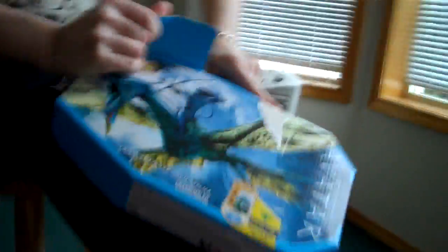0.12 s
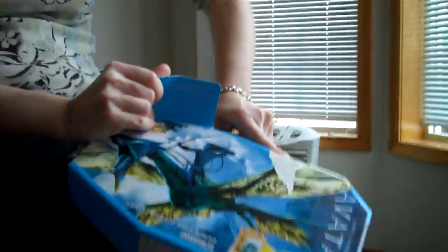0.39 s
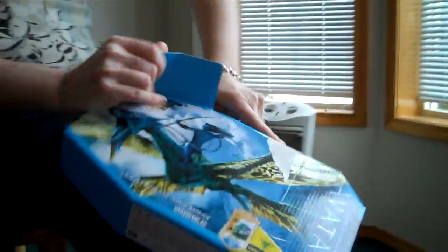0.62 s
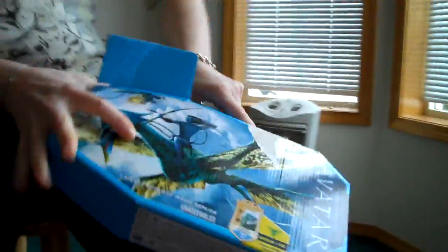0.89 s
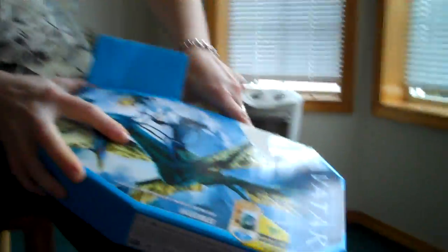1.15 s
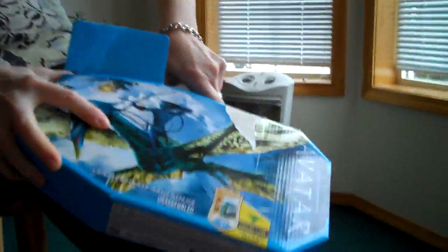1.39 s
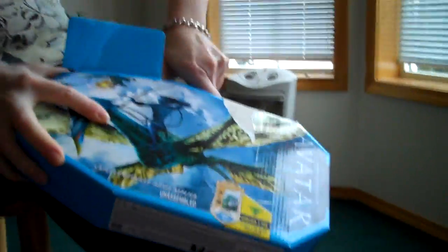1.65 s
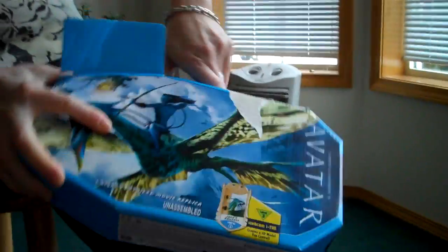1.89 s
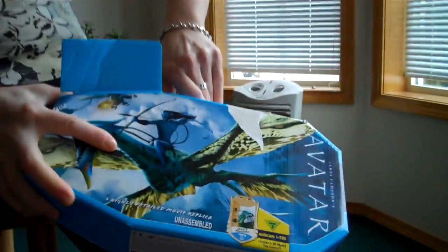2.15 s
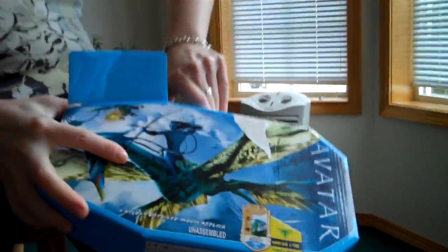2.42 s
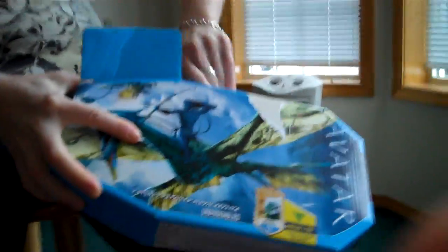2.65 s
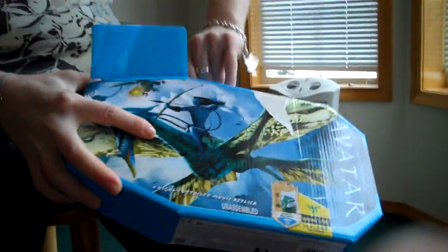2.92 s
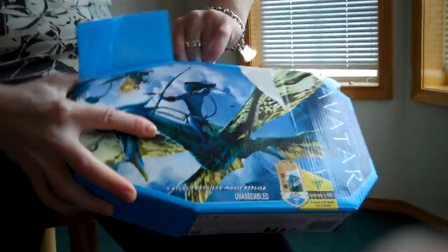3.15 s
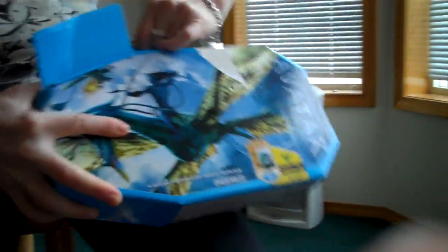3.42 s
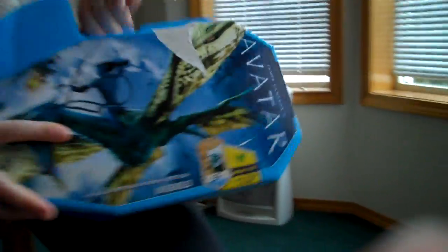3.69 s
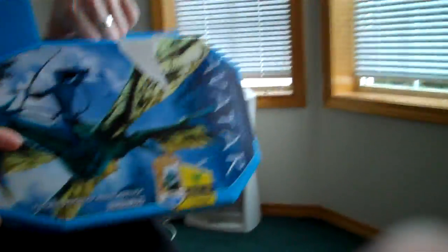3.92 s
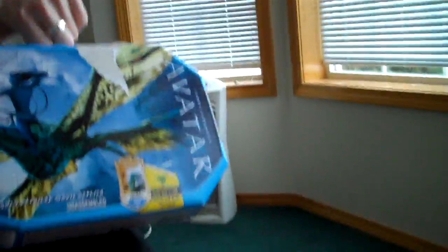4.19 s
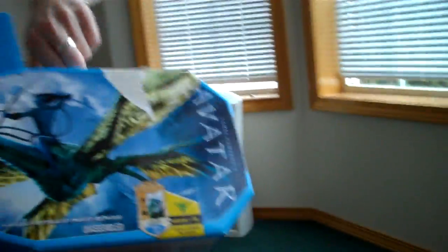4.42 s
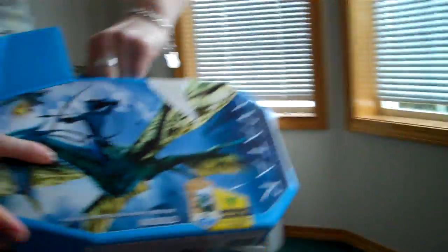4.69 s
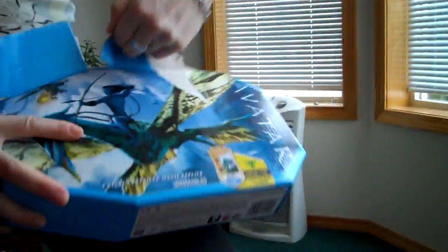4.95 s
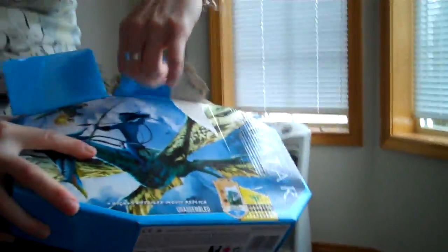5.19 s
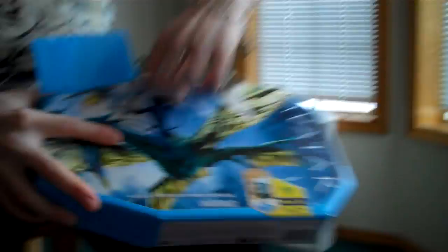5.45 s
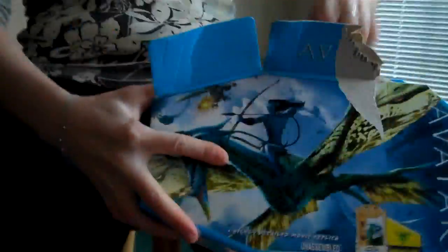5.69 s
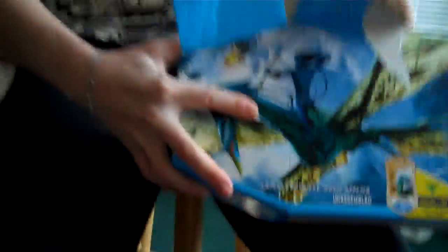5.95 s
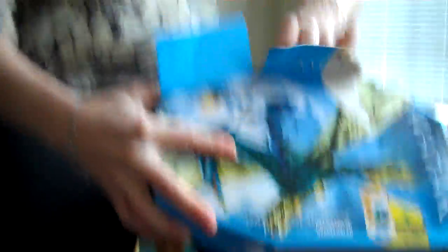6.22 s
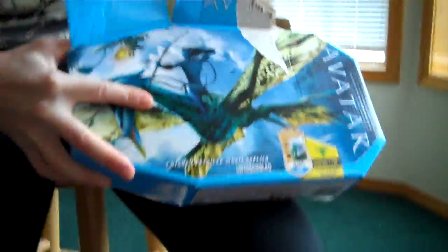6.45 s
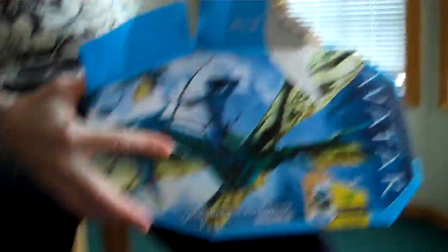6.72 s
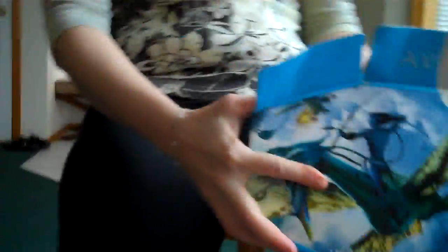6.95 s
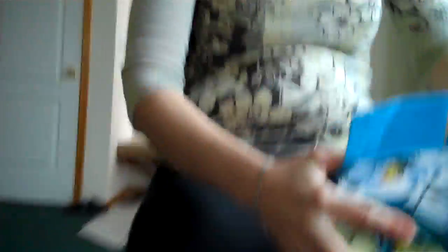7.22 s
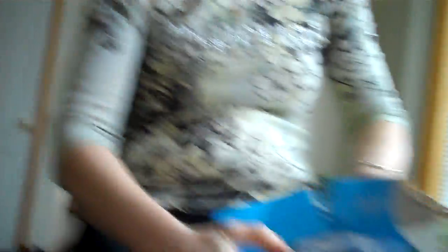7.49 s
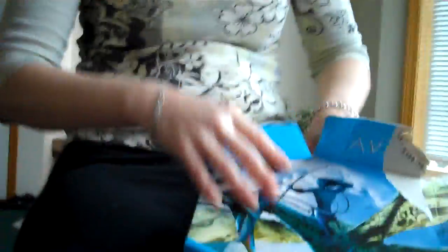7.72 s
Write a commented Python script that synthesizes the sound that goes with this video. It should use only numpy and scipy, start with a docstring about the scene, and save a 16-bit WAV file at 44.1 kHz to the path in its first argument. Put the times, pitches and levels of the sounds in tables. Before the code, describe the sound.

Hands pry open a thin hollow cardboard box up close, with sharp irregular cracks, papery crackling and dry finger rubbing in a quiet room.

```python
"""Sharp cracks of glue and creases run throughout, over rubbing hands that pry open a thin cardboard box in a carpeted room.
Each crack is a ragged noise burst that rings the hollow box, its panels and a crisp papery edge.
Fingers rub over the glossy card as flickering, ticking noise through the same bodies; bracelet links ring on two high modes.
A short tail of decaying noise bands answers, over shaped house noise and a faint hum.
Two microphone ports colour the treble, the preamps hiss, and peaks beyond full scale clip."""
import sys
import numpy as np
from scipy import signal
from scipy.fft import rfft, irfft, next_fast_len
from scipy.io import wavfile
from scipy.ndimage import uniform_filter1d

SR = 44100
rng = np.random.default_rng(int(sys.argv[2]) if len(sys.argv) > 2 else 0)


def store_pcm(level_fs):
    """Save levels as 16-bit WAV."""
    pcm = np.round(np.clip(level_fs, -1, 1) * 32767).astype(np.int16)
    wavfile.write(sys.argv[1], SR, np.atleast_2d(pcm).T)


def invert_db(x):
    """Field ratio 10**(x/20) for x, a level in decibels (scalar or array-like)."""
    u = np.asarray(x, float) / 20
    return 10 ** u


N = 346185

# Clear cracks of glue, creases and knocks; levels are peaks ahead of the ports:
# [start_s, length_ms, panel_db, boom_db, sizzle_db, pitch_hz]
CRACKS = [(0.02,4,-26,-58,-21.5,6200),(0.0266,2.3,-35,-49,-19.5,3000),(0.0436,1,-22.5,-62,-15.5,6300),(0.0728,2.7,-28,-55,-24,5790),(0.0892,10,-32,-59,-33,2940),
          (.1561,1.5,-50,-50,-30,5150),(0.1727,2.7,-45,-47,-32,6090),(0.228,4.7,-38,-49,-38,6980),(0.2638,6,-20,-40,-19,7740),(0.2764,2,-16.5,-49,-15,5600),(0.2861,14.5,-25.5,-37,-22,5550),(0.2968,3.3,-25,-32,-20,5600),
          (0.478,1.7,-33,-68,-32.5,1860),(0.538,4.1,-33.5,-39,-38,1260),(0.6425,1.5,-33,-42,-29,7320),(.665,2.4,-26.5,-47,-21,7760),(0.6771,13,-25.5,-57,-26,3880),
          (0.6928,30,-17,-57,-19,6100),(0.7025,15.5,-13,-19,-13.5,1660),(0.7186,12,-24,-44,-30,1800),(0.8009,5.3,-24.5,-30,-22.5,2830),(0.865,4.3,-34,-45,-32,7670),
          (0.9073,3.8,-35,-32,-30,5710),(0.915,3.8,-26,-33,-22,5800),(0.927,6,-31,-50,-34,5800),(.9633,4.5,-19,-30,-47,900),(.969,2.9,-20,-57,-17.5,2820),
          (1.1724,4.2,-29,-50,-29,6440),(1.1826,8.2,-21,-34.5,-22.5,1230),(1.2116,3.2,-25,-38,-26.5,1310),(1.281,4.4,-15,-23,-18.5,1220),(1.2868,2.2,-18,-22.5,-43,1740),
          (1.3943,11,-28,-39,-34,4840),(1.4104,2.9,-8.5,-23.5,-7.5,1660),(1.438,5.2,-22.5,-44,-25,7300),(1.4683,10,-28.5,-25,-35,1400),(1.5238,3.9,-17.5,-49,-17,5200),
          (1.5811,2.8,-4,-24,-6,2550),(1.5945,5,-24,-18,-34,5470),(1.6062,7.4,-6.5,-13,-4.5,5800),(1.7,4.3,-29,-33,-25,6330),(1.741,3.7,-10.5,-16.5,-9,1530),
          (1.763,6.8,-23.5,-30,-24,3630),(1.7888,2,-25,-48,-19.5,895),(1.8176,3.2,-18.5,-13,-21.5,1240),(1.8434,4.2,-17,-45,-14,6830),(2.0245,3.7,-24,-38.5,-20,7400),
          (2.0953,9,-36,-40,-63,1220),(2.2381,1.3,-55,-73,-29.5,8000),(2.34,1.7,-37,-39,-49,1610),(2.3782,3.7,-20,-14.5,-25,1200),(2.4051,9.9,-27,-30,-21.5,7750),
          (2.428,5.9,-15.5,-30.5,-14,5170),(2.4397,3.7,-19,-55,-16,3770),(2.4847,5,-17.5,-35,-13,7940),(2.5241,3.7,-21,-43,-13,7000),(2.583,1.9,-30,-54,-24,4960),
          (2.665,3.1,-16.5,-35.5,-16,2770),(2.686,1.7,-32,-43,-22,5900),(2.876,8.2,-27,-37,-28,7400),(2.963,3.9,-27,-39,-24,6140),(2.9844,1.3,-30,-38,-22,6160),
          (3.0034,4.3,-23.5,-34,-18.5,5960),(3.0223,10,-22.5,-36,-14,6070),(3.0487,2.7,-44,-51,-37,6220),(3.0706,2.2,-25,-42,-14,6040),(3.087,3.3,-35,-48,-28,6120),(3.096,4.6,-17,-41,-10,5860),
          (3.1188,7.4,-29,-51,-20,5800),(3.132,6.4,-32,-45,-26,6060),(3.1532,7,-19.5,-45,-19.5,6150),(3.1684,8.2,-39,-50,-30,6090),(3.259,.73,-26,-60,-9.5,5730),
          (3.275,3.1,-3,-26.5,-0.5,6400),(3.2814,2.8,-27,-45,-12,8000),(3.2906,1.87,-10,-18.5,-2,7450),(3.2967,8.7,-24,-36,-18,3830),(3.525,9.6,-35.5,-50,-39,3900),
          (3.601,1.9,-40,-67,-33,6050),(3.659,2.6,-24.5,-61,-18,8000),(3.718,3.4,-30,-48,-30,6300),(3.728,3,-30.5,-49,-28.5,1550),(3.7617,2.9,-36,-38,-33,6400),
          (3.7943,2,-31,-49,-28,7900),(3.8324,2.8,-20,-37,-20,7060),(3.838,7.1,-14.5,-54,-14.5,7000),(3.998,4.3,-37.5,-41.5,-45,2630),(4.128,8.9,-42.5,-45,-66,900),
          (4.2554,4.6,-39,-43.5,-52,1970),(4.3676,6.3,-23.5,-29.5,-26,920),(4.3897,2,-24.5,-63,-22,7550),(4.5406,14.5,-36,-43,-35.5,910),(4.5868,4.5,-31,-42,-41,2010),
          (4.6821,2.7,-42,-43,-33.5,8000),(4.726,1.5,-32,-65,-28,7200),(4.8177,1.5,-29.5,-50,-22.5,7850),(4.8863,3.3,-7.5,-39,5,7950),(4.8965,7.2,-5.5,-21,-3,7450),
          (4.9035,2.4,1,-13,2,6300),(4.9091,5,-10,-16,-7.5,6050),(4.9141,16,-19,-24,-15,1040),(4.9356,5.5,-13.5,-21.5,-13,5970),(4.9517,11,-22,-27,-21,5580),
          (5.2924,2.2,-48,-62,-36,7760),(5.469,8.3,-45,-31,-43,1130),(5.4845,4.2,-31,-26,-33,895),(5.4973,3.2,-15.5,-38,-13.5,5570),(5.563,6.1,-39,-25.5,-53,895),
          (5.5788,2.05,-37,-23,-34,900),(5.5968,7.5,-7,-26,-11.5,790),(5.6254,18,-29,-31.5,-24,1840),(5.646,12.7,-29,-38,-27,7600),(5.83,4.9,-31,-69,-26.5,7710),(5.8765,3.5,-25,-33.5,-33,1270),
          (5.9305,2.1,-18,-16,-17.5,4370),(5.9414,3.5,-21,-24.5,-42,1680),(5.996,10,-33,-53,-47,940),(6.029,6.5,-27,-57,-20,6700),(6.0903,21,-28.5,-46,-31,1400),
          (6.1686,5.9,-31.5,-57,-28,1192),(6.2296,2.7,-33,-62,-37,1360),(6.2822,4.9,-24.5,-29.5,-29,820),(6.374,11,-54,-41,-32,6060),(6.385,8.1,-58,-35.5,-50,900),(6.445,3.6,-40,-72,-29,7600),(6.5569,2,-17,-20.5,-15,6300),
          (6.7999,3,-47,-56,-40,1595),(6.9363,2.63,-13.5,-21.5,-15,1160),(7.0958,3.7,-37,-50,-37,1890),(7.208,4,-34,-38,-35,1240),(7.236,3.5,-31,-51,-39,1120),
          (7.433,3,-33,-46,-45,1730),(7.4459,2.6,-18.5,-34.5,-17,3450),(7.4922,7.3,-15.5,-37,-13,4020),(7.517,8,-34,-18,-17.5,6670),(7.5312,6.7,-13,-17,-32,1860),
          (7.538,4.8,-23,-33,-18,5940),(7.655,10.6,-28.5,-19,-44,2280),(7.7942,4.4,-11.5,-25,-32,1120)]
# Hands sliding on the card, base levels: [time_s, panel_db, boom_db, sizzle_db]
RUB = [(0.0, -49, -55.5, -42), (0.55, -58, -66, -53), (0.68, -48, -66, -45.5), (0.81, -47, -53, -43.5),
       (1.2, -45.5, -57, -40.5), (1.49, -53, -45, -47.5), (1.66, -45, -48, -40.5), (1.81, -42, -40.5, -68),
       (1.99, -50, -55.5, -47), (2.12, -47, -74, -44), (2.36, -66, -62, -60.5), (2.56, -53, -58, -49),
       (2.78, -57.5, -58, -51), (3.0, -42, -56.5, -42), (3.19, -45.5, -73, -43), (3.41, -50.5, -58, -42.5),
       (3.71, -54, -56, -47.5), (3.91, -56.5, -55, -54), (4.11, -60, -61, -53.5), (4.3, -62, -70, -58.5),
       (5.01, -47.5, -45.5, -44), (5.27, -50, -60, -46), (5.49, -51.5, -68, -49), (5.66, -50.5, -65, -52),
       (5.88, -56, -55, -47.5), (6.19, -50.5, -57.5, -43), (6.41, -49.5, -58, -46),
       (6.69, -50.5, -51.5, -45.5), (6.97, -51.5, -48.5, -52), (7.48, -54.5, -50, -41),
       (7.67, -52, -53, -43), (7.85, -48, -49, -43.5)]
# Quick swipes past an edge (gain up) and short rests (mostly gain down): [start_s, end_s, gain_db]
SWIPES = [(.005, 0.104, 2.5), (0.208, .27, 1.5), (0.461, 0.527, 5.5), (0.737, 0.798, 8),
          (0.987, 1.088, 2.5), (1.218, 1.28, 3.5), (1.398, 1.469, 6.5), (1.637, 1.7, 3), (1.876, 1.96, -5),
          (1.984, 2.106, 7.5), (2.264, 2.347, 4), (2.398, 2.459, 19), (2.725, 2.804, 5.5),
          (2.964, 3.044, 4.5), (3.347, 3.454, 4), (3.722, 3.873, 6), (4.012, 4.133, 4.5),
          (4.17, 4.247, -16), (4.245, 4.29, 9.5), (4.29, 4.376, 8), (4.452, 4.51, -1), (4.525, 4.621, 5),
          (4.98, 5.131, 5), (5.366, 5.442, -3), (5.454, 5.532, 3.5), (5.616, 5.714, 9), (6.059, 6.167, 8.5),
          (6.203, 6.242, 5), (6.33, 6.411, 5), (6.728, 6.793, -7), (7.014, 7.14, -6), (7.158, 7.316, 2.5),
          (7.36, 7.424, -3), (7.506, 7.55, 19), (7.717, 7.778, 2.5)]
# The grip decides which walls are free to ring: [time_s, favoured_tone_hz]
GRIP = [(0, 700), (.3, 460), (.55, 584), (.8, 430), (1.0, 600), (1.2, 490), (2.1, 543), (2.38, 513),
        (2.7, 443), (3.15, 580), (3.9, 417), (4.15, 564), (4.35, 370), (4.7, 457), (5.45, 314), (5.6, 675),
        (5.95, 417), (6.2, 604), (6.4, 318), (7.1, 595), (7.6, 428), (7.85, 610)]
# Resonances of the hollow box: [pitch_hz, width_hz, level_db]
BOX_MODES = [(142, 16, -18.5), (232, 82, -12), (290.5, 28.3, -1.5), (362, 61, -3.5), (452.4, 36.4, 1.5),
             (544.5, 102, -3), (716, 304, 1), (786, 121, 3)]
# Resonances of the flat panels: [pitch_hz, width_hz, level_db]
PANEL_MODES = [(1087, 365, -1), (1634, 232, 3.5), (1976, 760, 0), (2785, 570, 3.5), (4040, 1620, -1)]
# Tone of the crisp card edge: [pitch_hz, gain_db]
SIZZLE = [(3500, -40), (4800, -1), (6500, -3.5), (8000, -4), (9500, -4.5), (13800, -4.5), (17500, -1)]
# Bracelet links touching: [start_s, lower_mode_db, upper_mode_db]
LINKS = [(5.0145, -50, -36), (5.235, -32, -38), (5.2814, -42, -48), (5.2924, -33, -36), (5.3507, -41, -37)]
# Ring of a metal link: [pitch_hz, t60_s]
LINK_MODES = [(11320, 0.04), (13560, 0.045)]
# Decay of the room: [pitch_hz, t60_s]
ROOM_T60 = [(150, 0.35), (400, 1), (1000, 0.63), (2800, 0.43), (7000, 0.57), (14000, 0.33)]
# Likeness of left and right, 1 = same, -1 = opposite: [pitch_hz, correlation]
ALIKE = [(30, -0.89), (60, -0.93), (130, 0.74), (300, 0.95), (700, 0.92), (1400, 0.8), (3000, 0.24),
         (6500, 0.17)]
# Relative tone of the house noise: [pitch_hz, gain_db]
QUIET_TONE = [(20, -9), (35, 11.5), (60, -3), (90, -27), (170, -9.5), (450, -12.5), (1100, -13),
              (3000, -10.5), (8000, -18.5), (14000, -30)]
# Mains hum: [pitch_hz, rms_db]
HUM = [(120, -81)]
# Cavities of the microphone ports, left then right: [peak_hz, width_hz, tilt_db_per_octave above the peak]
PORTS = [(7590, 1000, 1.5), (6170, 990, -8)]
# Steep upper end of the treble: [pitch_hz, gain_db]
TOP_EDGE = [(14100, 0), (14350, -22), (16500, -30)]

# Softer, longer settling after each clear crack: delay past its length, added levels, added length
SETTLE_LATE_MS, SETTLE_DB, SETTLE_BOOM_DB, SETTLE_MS = 6, -19, -11, 7.1
# Small crackle at random moments: count, least lift over the rub, random extra lift,
# independent spread of each level, median length
CRACKLE_COUNT = 110
CRACKLE_OVER_RUB_DB, CRACKLE_SPREAD_DB, CRACKLE_COLOUR_DB, CRACKLE_MS = 4, 6, 2.5, 3
QUIET_DB = -57.5  # rms ahead of the ports
HISS_DB, HISS_FROM_HZ = -64.5, 5300  # preamp rms, knee of its rise


def cracks(rise=0.16, fall=0.6, ragged_db=3, pitch_db=4.0, ring_db=9, ring_q=9, spot_db=2.37, size=3072):
    """Each crack is a ragged burst of breaking fibres; it rings the box, the panels and the crisp edge."""
    s, ms, panel, boom, sizzle, pitch = breaks()[:, :, None, None]
    t = np.arange(size) / SR / (ms / 1000)  # time in crack lengths, as are rise and fall
    noise = rng.standard_normal((len(s), 3, size))
    # fibres part in bundles of 32 samples, so the burst stutters
    bundles = invert_db(ragged_db * np.repeat(noise[:, 2:, ::32], 32, axis=-1))
    envelope = (1 - np.exp(-t / rise)) * np.exp(-t / fall)
    burst = pair(noise[:, :2] * bundles * envelope, near=0.7)
    # every spot on the card drives the modes in its own proportions
    spot = spot_db * rng.standard_normal((len(s), len(BOX_MODES) + len(PANEL_MODES))).T[:, :, None, None]
    walls = [(f, w, db + free(f, s) + d) for (f, w, db), d in zip(BOX_MODES, spot)]
    flaps = [(f, w, db + d) for (f, w, db), d in zip(PANEL_MODES, spot[len(BOX_MODES):])]

    def panel_tone(hz):
        own_pitch = 0.5 + modes([(pitch, pitch / 3.5, pitch_db)], hz)
        return modes(flaps, hz) * own_pitch * soft(hz)

    def edge_tone(hz):
        ring = 1.5 + modes([(pitch, pitch / ring_q, ring_db)], hz)
        return crisp(hz) * ring

    sound = invert_db(panel) * peak(shaped(burst, panel_tone))
    sound = sound + invert_db(boom) * peak(shaped(burst, lambda hz: modes(walls, hz)))
    sound = sound + invert_db(sizzle) * peak(shaped(burst, edge_tone))
    out = np.zeros((2, N + 2 * size))
    for start, piece in zip((s.ravel() * SR).astype(int), sound):
        out[:, start:start + size] += piece
    return out[:, :N]


def breaks():
    """All cracks, in the columns of CRACKS: the clear ones, their settling, and crackle louder where hands work harder."""
    s, ms, panel, boom, sizzle, pitch = clear = np.transpose(CRACKS)
    later = s + (ms + SETTLE_LATE_MS) / 1000
    settle = [later, ms + SETTLE_MS, panel + SETTLE_DB, boom + SETTLE_BOOM_DB, sizzle + SETTLE_DB, pitch]
    even = rng.random((CRACKLE_COUNT, 3)).T
    odd = rng.standard_normal((CRACKLE_COUNT, 4)).T
    when = even[0] * N / SR
    size_db = CRACKLE_OVER_RUB_DB + CRACKLE_SPREAD_DB * even[1]
    levels = [c + size_db + CRACKLE_COLOUR_DB * d for c, d in zip(rubbing(when), odd)]
    lengths = CRACKLE_MS * invert_db(4.4 * odd[-1])
    pitches = 900 * 9.5 ** even[2]  # 900 to 8550 Hz
    crackle = [when, lengths, *levels, pitches]
    return np.concatenate([clear, settle, crackle], axis=1)


def rub(ticks_per_s=400., spread_db=3.5, tick_db=-5.5, tick_s=0.0023, flicker_db=1.43, shift_db=2.34):
    """Skin and card stick and slip: a flickering hiss with small ticks, through the same three bodies."""
    time = np.arange(N) / SR
    panel, boom, sizzle = (invert_db(c + 0.81 * walk(30)) for c in rubbing(time))
    tick_sizes = invert_db(spread_db * np.minimum(rng.exponential(size=N), 3))
    ticks = (rng.random(N) < ticks_per_s / SR) * tick_sizes
    grip = signal.lfilter([1], [1, -np.exp(-1 / (tick_s * SR))], ticks)
    strength = invert_db(flicker_db * walk(40)) + invert_db(tick_db) * unit(grip)
    push = pair(rng.standard_normal((2, N)) * strength, near=0.075)
    # each mode comes and goes as the fingers move
    walls, flaps = 0, 0
    for mode in BOX_MODES:
        drift = invert_db(free(mode[0], time) + shift_db * walk(17))
        walls = walls + drift * shaped(push, lambda hz: modes([mode], hz))
    for mode in PANEL_MODES:
        drift = invert_db(shift_db * walk(15))
        flaps = flaps + drift * shaped(push, lambda hz: modes([mode], hz) * soft(hz))
    return panel * unit(flaps) + boom * unit(walls) + sizzle * unit(shaped(push, crisp))


def rubbing(s, edge_s=0.002):
    """Panel, boom and sizzle dB of the sliding hands at time s; swipes and rests have sudden ends."""
    at, *columns = np.transpose(RUB)
    swipe_db = sum(db * np.clip(np.minimum(s - a, b - s) / edge_s, 0, 1) for a, b, db in SWIPES)
    return [np.interp(s, at, c) + swipe_db for c in columns]


def free(hz, s, below_db=4.5, above_db=9):
    """The grip at time s damps a box mode by so many dB per octave below or above the favoured tone."""
    octaves = np.log2(hz / np.interp(s, *np.transpose(GRIP)))
    return np.where(octaves > 0, -above_db * octaves, below_db * octaves)


def soft(hz):
    """Card swallows the top of the panel ring."""
    return 1 / (1 + 1j * hz / 5000) ** 2


def crisp(hz):
    """The papery top of the card, falling 30 dB per octave below 3500 Hz."""
    return invert_db(table(SIZZLE, hz) - 30 * np.log2(np.maximum(3500 / (hz + 1), 1)))


def bracelet():
    """Tiny metal links tick and ring on two short high modes."""
    out = np.zeros(N)
    for s, *levels in LINKS:
        t = np.maximum(np.arange(N) / SR - s, 0)
        for db, (hz, t60) in zip(levels, LINK_MODES):
            out = out + invert_db(db - 60 * t / t60) * np.sin(2 * np.pi * hz * t)
    return out


def room(x, gap_s=0.0012, build_s=0.0054, early_db=6, early_s=0.02, size=28000):
    """Octave bands of echoes that start after the first wall and die at their own rate; near walls are stronger."""
    t = np.arange(size) / SR
    noise, tail = pair(rng.standard_normal((2, size))), 0
    for centre in 125 * 2 ** np.arange(8):
        band = shaped(noise, lambda hz: np.cos(np.pi / 2 * np.clip(np.log2((hz + 1) / centre), -1, 1)) ** 2)
        tail = tail + band * invert_db(-60 * t / table(ROOM_T60, centre))
    tail = tail * np.clip((t - gap_s) / build_s, 0, 1) * (1 + invert_db(early_db) * np.exp(-t / early_s))
    tail = tail / np.sqrt(np.sum(tail ** 2) / 2)
    return signal.fftconvolve(x.mean(axis=0, keepdims=True), tail, axes=1)[:, :N]


def quiet():
    """Soft hiss and rumble of the house as shaped noise, with a mains hum as a sine."""
    air = unit(shaped(pair(rng.standard_normal((2, N))), lambda hz: invert_db(table(QUIET_TONE, hz))))
    hum = sum(invert_db(db) * np.sqrt(2) * np.sin(2 * np.pi * hz * np.arange(N) / SR) for hz, db in HUM)
    return invert_db(QUIET_DB) * air + hum


def table(points, hz):
    """Straight lines on a log-frequency axis."""
    f, v = np.transpose(points)
    return np.interp(np.log(hz + 1), np.log(f), v)


def modes(rows, hz):
    """Complex response of damped resonances, neighbours in opposite sign."""
    return sum((-1) ** k * invert_db(db) * 1j * w * hz / (f ** 2 - hz ** 2 + 1j * w * hz)
               for k, (f, w, db) in enumerate(rows))


def freqs(size):
    """Bin frequencies of a real transform."""
    return np.arange(size // 2 + 1) * SR / size


def shaped(x, gain):
    """Filter the last axis by a function of frequency."""
    size = 2 * next_fast_len(x.shape[-1] // 2 + 1024, True)  # spare room for the ring
    return irfft(rfft(x, size) * gain(freqs(size)), size)[..., :x.shape[-1]]


def pair(noise, near=0.):
    """Left and right from two noises, as alike as ALIKE says; near pulls them towards the same signal."""
    alike = lambda hz: np.clip(near + (1 - near) * table(ALIKE, hz), -1, 1)
    mid = shaped(noise[..., 0, :], lambda hz: np.sqrt((1 + alike(hz)) / 2))
    side = shaped(noise[..., 1, :], lambda hz: np.sqrt((1 - alike(hz)) / 2))
    return np.stack([mid + side, mid - side], axis=-2)


def unit(x):
    """Scale to rms 1."""
    return x / np.sqrt(np.mean(x ** 2))


def peak(x):
    """Scale each stereo piece so that its loudest millisecond swings to about 1."""
    power = uniform_filter1d(np.mean(x ** 2, axis=-2), size=44)
    return x / np.sqrt(2 * power.max(axis=-1))[:, None, None]


def walk(rate):
    """Random levels, rms about 1.9, gliding to a new value every 1 / rate s."""
    k = int(SR / rate)
    return 2.38 * uniform_filter1d(np.repeat(rng.standard_normal(N // k + 1), k), k)[:N]


def scene():
    """The box and the bracelet close by, their echo, the still house."""
    box = cracks() + rub() + bracelet()
    return box + invert_db(-9.5) * room(box) + quiet()


def ports(hz):
    """Each microphone sits behind a small cavity: a peak, then a steep fall; a shelf holds the treble down."""
    cavities = []
    for f, w, db in PORTS:
        resonance = f ** 2 / (f ** 2 - hz ** 2 + 1j * w * hz)
        tilt = invert_db(db * np.log2(np.maximum(hz / f, 1)))
        cavities.append(resonance * tilt)
    shelf = (1 + 1j * hz / 9000) / (1 + 1j * hz / 3000)
    return np.array(cavities) * shelf * invert_db(table(TOP_EDGE, hz))


def band_limit(x):
    """A steep low-pass at the top of the band."""
    return signal.sosfilt(signal.butter(12, 15100, fs=SR, output="sos"), x)


def record(dry):
    """The ports colour the treble, the right is a little louder, the preamps hiss and overloads clip."""
    heard = shaped(dry, ports) * invert_db(np.array([[-.8], [.8]]))  # left, right dB
    # the hiss rises with pitch and meets the top edge twice
    hiss = shaped(rng.standard_normal(dry.shape),
                  lambda hz: invert_db(2 * table(TOP_EDGE, hz)) * hz / (hz + HISS_FROM_HZ))
    mix = np.clip(heard + invert_db(HISS_DB) * unit(hiss), -1, 1)
    return band_limit(mix)


dry = scene()
out = record(dry)
store_pcm(out)
```